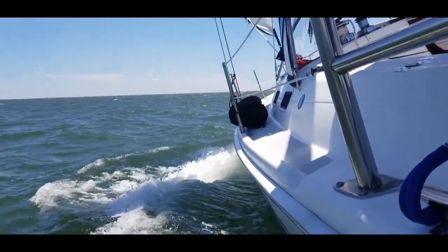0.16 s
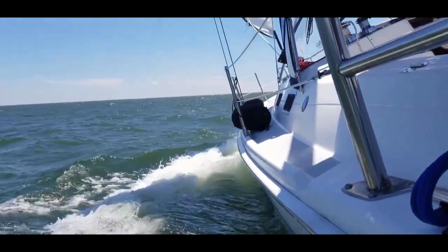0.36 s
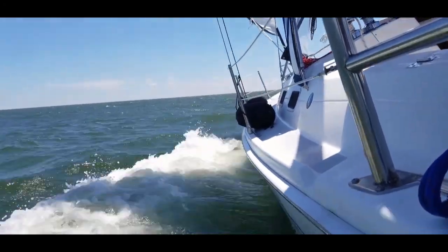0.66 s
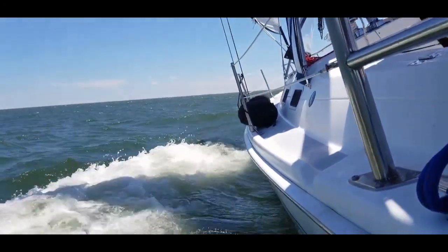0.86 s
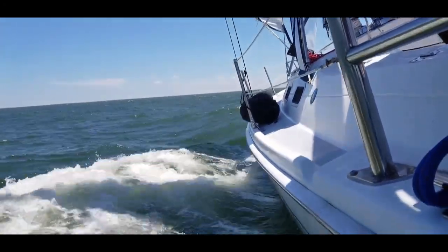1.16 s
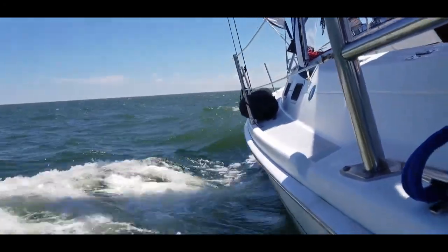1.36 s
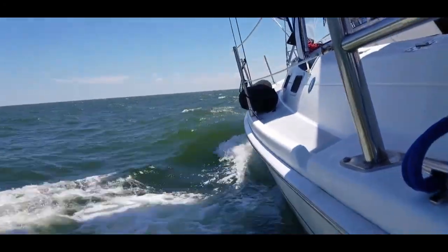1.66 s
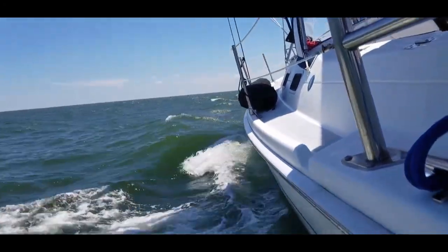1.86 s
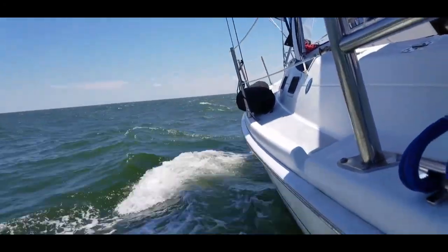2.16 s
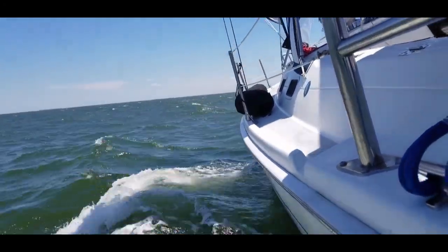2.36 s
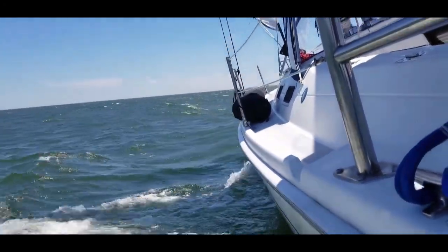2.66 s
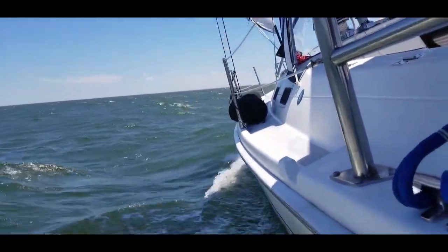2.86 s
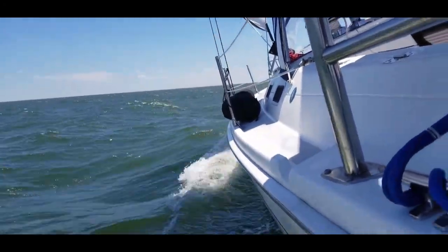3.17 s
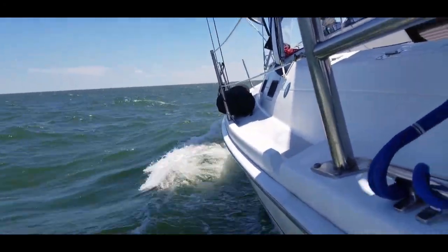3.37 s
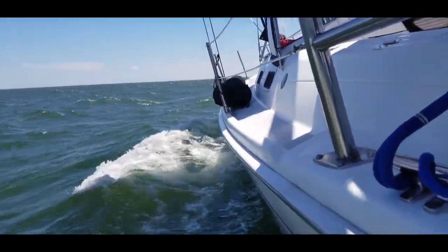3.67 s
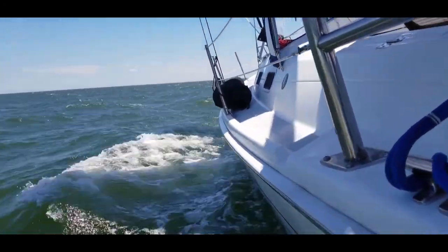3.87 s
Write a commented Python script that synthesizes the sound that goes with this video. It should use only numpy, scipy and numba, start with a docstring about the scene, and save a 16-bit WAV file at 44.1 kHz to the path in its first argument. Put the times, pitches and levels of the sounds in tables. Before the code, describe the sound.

Water foams and hisses steadily along a sailing boat's hull, close by in open air. Wind thumps the handheld phone microphone just after one second, then much harder around three seconds, with rumbling until the end.

```python
"""The bow wave of a sailing boat foams along the hull in choppy sea, heard from a phone held over the rail.
Foam, wash and spray are coloured noise, the first two with a swarm of ringing bubbles.
Wavelets slap, drops tick and a faint whistle sounds: noise bursts, each through one resonance,
broad or, for the whistle, narrow. Wind rumbles on the two microphone ports, as low noise unrelated between
them, and hits them in short rough puffs of noise and in thumps and sharper knocks, a swing or two of a sine."""
import sys
import numpy as np
from scipy import signal
from scipy.fft import rfft, irfft
from scipy.io import wavfile
from scipy.ndimage import uniform_filter1d
from numba import njit

SR = 44100
rng = np.random.default_rng(int(sys.argv[2]) if len(sys.argv) > 2 else 0)


def pcm_store(signal):
    """Save signal as 16-bit PCM."""
    levels = np.round(np.clip(np.atleast_2d(signal), -1, 1) * 32767)
    wavfile.write(sys.argv[1], SR, levels.astype(np.int16).T)


N = 176400

EDDY_SPREAD_DB = 4.5  # spread of the kick sizes in wind rumble and puffs

# wind rumble
EDDIES_PER_S, EDDY_DB = 60, 0
GUST_TILT, GUST_MID_DB = 0.052, -29  # dB per octave for each dB of wind above the middle level
BUFFET_DB, BUFFET_PER_S = 2.0, 35
EVEN_S, EVEN_SHARE = 0.036, 0.46  # window, and share of the level swings that is evened out

# puffs
PUFF_ATTACK_S, PUFF_TRIM_DB, PUFF_ROUGH_DB = 0.0039, -1.5, 2.5
PUFF_RIGHT_TILT_DB = 0.5  # extra brightness on the right, dB per octave
PUFF_EDDIES_PER_S, PUFF_EDDY_DB, PUFF_KICK_DB = 600, -0.5, 8.5

THUMP_CYCLES = 1.46
DROP_TRIM_DB = 1.5

# water
FIZZ_PER_S, FIZZ_DB, FIZZ_SPREAD_DB = 900, -9.5, 2.5
SWELL_DB, SWELL_PER_S = 0.9, 24
CHURN_DB, CHURN_PER_S = 1.0, 20
FLICKER_DB, FLICKER_PER_S = 1.0, 18
BUBBLES_PER_S, BUBBLE_DB, BUBBLE_SPREAD_DB = 1200, -7.5, 1.5
BUBBLE_EVEN = 0.03  # keeps the largest bubbles within the crowd
BUBBLE_CYCLES, BUBBLE_GLIDE = 7.1, 0.26  # fade length in cycles, share of pitch gained over it

# phone
DUCK_FROM_DB, DUCK_SHARE, DUCK_S = -29, 0.21, 0.078
TOP_HZ = 15850


def undb(db):
    """Gain of a level in dB."""
    return 10 ** (np.asarray(db) / 20)


def unit(x):
    """Scale to rms 1."""
    return x / np.sqrt(np.mean(x ** 2))


def pan(pan_db):
    """Left and right offsets in dB from a left-minus-right difference."""
    return np.array([[pan_db], [-pan_db]]) / 2


def curve(table, index):
    """One column of a table, drawn as straight lines over time."""
    times, values = np.array(table)[:, [0, index]].T
    return np.interp(np.arange(N) / SR, times, values)


def shape(table, hz):
    """The second column of a table, read on a log frequency axis."""
    points = np.array(table)
    return np.interp(np.log(hz), np.log(points[:, 0]), points[:, 1])


def walk(rate):
    """Smooth random level with spread 1, from random steps at this rate per second."""
    k = int(SR / rate)
    steps = np.repeat(rng.standard_normal(N // k + 1), k)
    smooth = uniform_filter1d(uniform_filter1d(steps, k), k)
    return unit(smooth[:N])


def bands(x, table):
    """Colour x and split it into overlapping half-octave parts that sum to rms 1."""
    hz = np.maximum(np.fft.rfftfreq(N, 1 / SR), 1)
    low_hz, high_hz = table[0][0], table[-1][0]
    inside = (hz >= low_hz) & (hz <= high_hz)
    coloured = irfft(rfft(x) * undb(shape(table, hz)) * inside, N)
    spec = rfft(unit(coloured))
    for centre in low_hz * 2 ** np.arange(0, np.log2(high_hz / low_hz) + 0.5, 0.5):
        triangle = np.maximum(1 - 2 * abs(np.log2(hz / centre)), 0)
        yield centre, irfft(spec * triangle, N)


def burst(start_s, attack_s, decay_s):
    """Slice and envelope of a short burst: straight rise to 1, exponential fall."""
    a = int(start_s * SR)
    t = np.arange(min(int((attack_s + 6 * decay_s) * SR), N - a)) / SR
    env = np.minimum(t / attack_s, 1) * np.exp(-np.maximum(t - attack_s, 0) / decay_s)
    return slice(a, a + len(t)), env


def eddies(rate, db, spread_db):
    """Two unrelated noises with sparse kicks of either sign."""
    u, noise = rng.random((2, N)), rng.standard_normal((2, 2, N))
    kicks = (u < rate / SR) * np.sign(noise[0]) * undb(spread_db * abs(noise[0]))
    return noise[1] + undb(db) * unit(kicks)


def splat(noise, hz, width, env, order):
    """A burst of noise through one resonance, given the energy of its envelope."""
    edges = [hz / 2 ** (width / 2), hz * 2 ** (width / 2)]
    sos = signal.butter(order, edges, "band", fs=SR, output="sos")
    x = signal.sosfilt(sos, noise) * env
    return x * np.sqrt(np.sum(env ** 2) / np.mean(np.sum(x ** 2, axis=1)))


def wind():
    """Low turbulence, unrelated at the two ports; stronger gusts are brighter."""
    # Wind on the ports. Each row: time in seconds, left level in dB, right level in dB.
    gusts = [(0.0, -69, -51), (0.045, -46, -38.5), (0.07, -38, -45), (0.09, -32, -37.5), (0.16, -33, -36),
             (0.18, -58, -35), (0.274, -41, -52), (0.394, -37, -41), (0.429, -44, -53), (0.469, -31, -54),
             (0.499, -51, -35.5), (0.614, -49, -40), (0.659, -29, -32.5), (0.688, -26, -31),
             (0.763, -43.5, -40.5), (0.978, -40.5, -41.5), (1.053, -61, -36), (1.068, -34, -39),
             (1.093, -44, -23), (1.137, -28.5, -60), (1.177, -31.5, -25), (1.232, -19, -20),
             (1.247, -19, -42), (1.272, -16, -16.5), (1.352, -31.5, -40), (1.377, -24, -20),
             (1.397, -39, -44), (1.457, -38, -33), (1.482, -30.5, -43), (1.507, -31.5, -34.5),
             (1.527, -37, -56), (1.546, -21, -38), (1.601, -26.5, -43), (1.651, -49, -59),
             (1.671, -19.5, -29.5), (1.716, -50, -37), (1.731, -33, -43), (1.756, -31, -33),
             (1.776, -42, -49), (1.801, -28.5, -47), (1.861, -45, -37), (1.921, -53, -38),
             (1.941, -37, -55), (1.985, -43.5, -38), (2.06, -44, -39), (2.085, -50, -44),
             (2.13, -26.5, -53), (2.15, -49, -55), (2.17, -39, -41), (2.315, -53, -84), (2.415, -46.5, -40),
             (2.529, -49.5, -70), (2.589, -44, -41), (2.654, -81, -49), (2.674, -29, -33),
             (2.694, -61, -30), (2.764, -29, -65), (2.799, -53, -41), (2.829, -48, -38.5),
             (2.908, -42, -36), (2.943, -32, -23), (2.968, -31, -55), (2.993, -23, -19.5),
             (3.018, -25, -31), (3.063, -18, -20), (3.088, -11, -19), (3.118, -23, -17), (3.138, -8.5, -7),
             (3.183, -26, -42), (3.203, -25, -32), (3.253, -24, -26), (3.273, -18, -20),
             (3.312, -24.5, -21.5), (3.327, -33, -37), (3.352, -27, -26), (3.367, -40, -34),
             (3.407, -32, -24), (3.442, -23.5, -44), (3.472, -38, -41), (3.492, -26, -32),
             (3.542, -37, -34), (3.572, -24, -28), (3.622, -34.5, -26.5), (3.652, -32, -41),
             (3.677, -48, -40), (3.692, -38, -34), (3.737, -41.5, -54), (3.756, -30, -41),
             (3.831, -40, -36), (3.851, -25, -34), (3.871, -42, -32), (3.889, -27, -30), (3.905, -38, -15),
             (3.926, -22, -32), (3.946, -26, -27), (3.964, -29, -30), (3.975, -37, -40), (3.996, -29, -29)]
    # Colour of the rumble. Each row: frequency in Hz, relative density in dB per Hz before the gust tilt.
    rumble = [(18, -56), (30, -6.5), (60, 1), (120, -1), (200, -5.5), (300, -13), (500, -16.5), (900, -78)]
    level_db = np.array([curve(gusts, index=1), curve(gusts, index=2)])
    tilt_db = GUST_TILT * (level_db - GUST_MID_DB)
    low = 0
    for hz, x in bands(eddies(EDDIES_PER_S, EDDY_DB, EDDY_SPREAD_DB), rumble):
        low = low + x * undb(tilt_db * np.log2(hz / 100))
    power = uniform_filter1d(low ** 2, int(EVEN_S * SR))
    evened = low / power ** (EVEN_SHARE / 2)
    buffet = undb(BUFFET_DB * np.array([walk(BUFFET_PER_S), walk(BUFFET_PER_S)]))
    return unit(evened * buffet) * undb(level_db)


def puffs():
    """Short rough blasts of air with a kick at the crest, brighter on the right port."""
    # Puffs of wind. Each row: start in seconds, level in dB before the common trim,
    # left minus right in dB, decay in ms, brightness on the left in dB per octave.
    blasts = [(0.132, -25, -3, 4.4, 3), (0.82, -32.5, -1, 28, -8), (1.087, -33, 6, 8, 7),
              (1.214, -20.5, -1, 11, 0.5), (1.223, -11.5, -1.5, 7.9, -0.7), (1.239, -20, 8, 6.1, -2),
              (1.252, -31, -3, 14, -5), (1.272, -15, -2, 11, -2.5), (1.285, -18, -4, 7.2, -9),
              (1.295, -22.5, -10, 7.4, 1.5), (1.305, -16, 0, 3.5, -2.5), (1.312, -31, 9, 16, 6),
              (1.37, -28.5, -9, 11.4, -4), (1.448, -34.5, -3, 24, 4), (1.474, -32.5, -9, 5, 4),
              (1.501, -25.5, -3, 2.9, 4), (1.513, -31.5, -10, 4, 3), (1.523, -30, -4, 12, 3),
              (1.565, -28, -5, 6.4, -7), (1.55, -30, -2, 27, -2), (1.578, -36, -7, 7.7, -8),
              (1.786, -33.5, -3, 11, 0), (2.733, -29, -5, 4.6, 2.5), (2.947, -52, -4, 10.4, -4),
              (2.998, -26.5, -4.0, 11, 7.5), (3.027, -23, -4, 12, -7), (3.061, -16.5, -10, 6.7, 1.9),
              (3.069, -16.5, -1, 16, 1.5), (3.082, -17, -13, 12, -6.5), (3.094, -30, -12, 9.8, -11),
              (3.116, -20, 1, 9.7, 2), (3.129, -7.5, -8, 6, -0.7), (3.161, -12.5, -6, 6, -0.2),
              (3.172, -20, -5, 11, -6), (3.182, -23, 14, 7.5, 1), (3.195, -14.5, -1.5, 14, -2),
              (3.225, -26.5, -15, 8.4, -2), (3.242, -26.5, -5, 27, 5), (3.263, -17.5, -7.5, 14, -2),
              (3.298, -24, 20, 3.9, -8.5), (3.342, -22.5, 4.5, 10, -5), (3.41, -22, -7, 8.4, -1.5),
              (3.422, -22, 0.5, 21, -2.8), (3.458, -42, -10, 4.3, 9), (3.558, -18, -2.5, 12, -5.5),
              (3.57, -32.5, -5, 24, 2), (3.592, -23, 3, 9.6, -2.5), (3.619, -41, -15, 8.1, -15),
              (3.798, -27, -2, 3.9, -10), (3.844, -30.5, -8, 34, -1.5), (3.88, -20.5, 8, 8.9, -2.3),
              (3.892, -19.5, -7.5, 17, -0.5), (3.913, -27, 4, 24, 2.1), (3.937, -27, 0, 14, -6),
              (3.958, -23, 5, 9, -3)]
    # Colour of the air. Each row: frequency in Hz, relative density in dB per Hz before the brightness.
    air_colour = [(90, -9), (170, -7), (260, 0.5), (480, -5.5), (760, -3), (1200, -10.5), (1700, -20),
                  (3400, -37.5), (7000, -59)]
    rough = undb(PUFF_ROUGH_DB * np.array([walk(250), walk(250)]))
    drive = eddies(PUFF_EDDIES_PER_S, PUFF_EDDY_DB, EDDY_SPREAD_DB) * rough
    crests = ((np.array(blasts)[:, 0] + PUFF_ATTACK_S) * SR).astype(int)
    drive[:, crests] = undb(PUFF_KICK_DB) * rng.choice([-1, 1], (len(crests), 2)).T
    parts = list(bands(drive, air_colour))
    out = np.zeros((2, N))
    for s, db, pan_db, decay_ms, tilt_db in blasts:
        at, env = burst(s, PUFF_ATTACK_S, decay_ms / 1000)
        tilts = np.array([[tilt_db], [tilt_db + PUFF_RIGHT_TILT_DB]])
        air = sum(x[:, at] * undb(tilts * np.log2(hz / 600)) for hz, x in parts) * env
        # each port gets the energy of the envelope
        air = air * np.sqrt(np.sum(env ** 2) / np.sum(air ** 2, axis=1, keepdims=True))
        out[:, at] += air * undb(db + PUFF_TRIM_DB + pan(pan_db))
    return out


def thumps_and_knocks():
    """A swing or two of pressure under a smooth window, each port at its own point of the swing."""
    # Low thumps and higher, sharper knocks. Each row: start in seconds, window peak level in dB,
    # pitch in Hz, left minus right in dB.
    knocks = [(0.085, -33, 120, 0), (1.208, -21, 178, 1), (1.2245, -9, 800, -10), (1.228, -11, 500, 1),
              (1.241, -12, 600, -3), (1.274, -27, 260, 5), (1.304, -11, 210, 7), (1.33, -28, 110, -2),
              (1.5, -21, 149, -1), (1.561, -26, 202, 5), (2.124, -36, 110, -4), (2.161, -26, 140, 1),
              (2.691, -25, 121, -2), (2.992, -12.5, 140, -2), (3.063, -10, 443, -5), (3.08, -15, 600, -2),
              (3.089, -6, 202, 6), (3.13, -6, 650, -3), (3.133, -9, 505, 2), (3.142, -12, 99, -3),
              (3.197, -9, 700, 2), (3.263, -13, 130, 1), (3.57, -21, 350, 3), (3.853, -22, 70, 13),
              (3.884, -24, 605, 5), (3.8942, -13, 800, -1), (3.959, -21, 190, 6)]
    out = np.zeros((2, N))
    turns = rng.random((len(knocks), 2, 1))  # starting points in cycles
    for (s, db, hz, pan_db), turn in zip(knocks, turns):
        a, n = int(s * SR), int(THUMP_CYCLES * SR / hz)
        swing = np.hanning(n) * np.sin(2 * np.pi * (hz * np.arange(n) / SR + turn))
        out[:, a:a + n] += swing * undb(db + pan(pan_db))
    return out


def drops():
    """Single drops close by: very short ticks of noise through a gentle resonance."""
    # Drops. Each row: start in seconds, level in dB before the common trim, centre in Hz,
    # left minus right in dB, decay in ms, width in octaves.
    ticks = [(0.3244, -43, 8740, 2, 2.3, 0.98), (0.4658, -49, 9820, 0.0, 2.5, 0.9),
             (0.491, -36.5, 11800, -0.5, 2.5, 0.9), (0.5437, -45, 10500, -2, 2.5, 0.9),
             (2.4993, -41, 12600, -1, 2.5, 0.76), (2.5703, -33.5, 13500, 0.0, 2.5, 0.9),
             (2.9853, -24, 13100, -5, 0.85, 0.8), (2.9841, -33.5, 6960, 4, 2, 1.1),
             (3.0712, -40, 3200, -3, 0.92, 1), (3.128, -43, 4500, -1, 1, 1.6),
             (3.165, -32.5, 3320, -2, 0.73, 2.1), (3.245, -43, 4200, 0, 1.5, 1.6),
             (3.1754, -37, 13600, 2.5, 2.5, 0.9), (3.2195, -44, 9010, 3, 2.5, 0.9),
             (3.3094, -48, 11200, 2, 2.5, 0.9)]
    out, noise = np.zeros((2, N)), rng.standard_normal((2, N))
    for s, db, hz, pan_db, decay_ms, width in ticks:
        at, env = burst(s, 0.0014, decay_ms / 1000)
        tick = splat(noise[:, at], hz, width, env, order=1)
        out[:, at] += tick * undb(db + DROP_TRIM_DB + pan(pan_db))
    return out


def slaps_and_whistle():
    """Slaps of wavelets, a sharp puff, and a faint narrow whistle: noise through a steeper resonance."""
    # Slaps, the puff near 2.7 s, and the whistle near 2.6 kHz. Each row: start in seconds,
    # level in dB, centre in Hz, width in octaves, decay in ms.
    resonant_bursts = [(0.071, -28, 1090, 1.34, 2), (0.82, -41, 1000, 1, 2), (1.408, -45, 2530, 0.12, 22),
                       (1.432, -45, 2660, 0.13, 12), (1.446, -46, 2650, 0.12, 10),
                       (2.732, -34.5, 1010, 1.8, 3), (3.415, -45, 1880, 0.86, 17),
                       (3.462, -41.5, 1800, 0.88, 2.7), (3.57, -45.5, 2000, 1.1, 8),
                       (3.598, -47.5, 1700, 1, 14), (1.665, -26, 880, 0.54, 4.3),
                       (1.667, -38.5, 2830, 1.4, 4.2), (2.646, -36.5, 1010, 3.2, 6.7),
                       (2.657, -43, 2660, 1.3, 22), (2.674, -32.5, 2310, 1.7, 1.9),
                       (2.9845, -27.5, 2800, 1.05, 1.5)]
    out, noise = np.zeros((2, N)), rng.standard_normal((2, N))
    for s, db, hz, width, decay_ms in resonant_bursts:
        at, env = burst(s, 0.003, decay_ms / 1000)
        shared = noise[:, at] + noise[0, at]  # sides partly alike, the left louder
        out[:, at] += splat(shared, hz, width, env, order=3) * undb(db)
    return out


@njit
def ring(start, hz, cycles, glide, size, n):
    """Bubbles: short tones that rise as they fade."""
    out = np.zeros(n)
    for k in range(len(start)):
        length, phase = int(3 * cycles * SR / hz[k]), 0.
        for i in range(min(length, n - start[k])):
            age = i * hz[k] / SR / cycles
            phase += 2 * np.pi * hz[k] * (1 + glide * age) / SR
            out[start[k] + i] += size[k] * np.sin(phase) * np.exp(-2 * age)
    return out


def bubbles():
    """A dense random swarm of bubbles; size grows with pitch to offset the shorter ringing."""
    u = rng.random((int(BUBBLES_PER_S * N / SR), 3))
    start = (u[:, 0] * N).astype(np.int64)
    hz = 250 + 3500 * u[:, 1]
    size = undb(-BUBBLE_SPREAD_DB * np.log(u[:, 2] + BUBBLE_EVEN)) * np.sqrt(hz)
    return unit(ring(start, hz, 1. * BUBBLE_CYCLES, 1. * BUBBLE_GLIDE, size, N))


def water():
    """Foam, wash and spray: noise and bubbles whose bands swell together and flicker alone."""
    # Course of the bow wave. Each row: time in seconds, then foam, wash and spray level in dB
    # before swell, churn, flicker and foam brightness.
    wave = [(0.0, -37.5, -44.5, -47.5), (0.2, -35.5, -46, -45), (0.38, -37, -44.5, -46),
            (0.59, -37.5, -45, -44.5), (0.81, -36, -42, -44.5), (1.06, -38, -43.5, -43.5),
            (1.19, -37.5, -41.5, -43.5), (1.44, -44, -48, -49.5), (1.75, -44.5, -48, -48),
            (2.0, -46.5, -48, -49), (2.41, -42, -49.5, -48), (2.7, -41, -49, -46), (2.9, -43, -46, -46),
            (3.03, -36.5, -44.5, -44.5), (3.14, -34.5, -47.5, -48), (3.21, -44, -48.5, -49),
            (3.36, -44.5, -48.5, -49.5), (3.59, -47.5, -53.5, -53), (3.87, -50, -58, -55),
            (4.0, -51, -55, -54)]
    # Colours of the three layers. Each row: frequency in Hz, relative density in dB per Hz.
    foam = [(150, -7), (300, -6), (460, -7.5), (760, 1), (1050, -2), (1400, -5.5), (1700, -14), (2500, -17)]
    wash = [(1200, -3.5), (1700, -7), (2100, -2), (2800, -5), (3700, -9.5), (5000, -10.5), (7000, -42)]
    spray = [(3500, -10), (5500, -4), (7200, -6.5), (9000, -3.5), (11000, -2), (13200, -0.5), (14200, -5),
             (16500, -2)]
    # Likeness of left and right. Each row: frequency in Hz, likeness from 0 to 1.
    likeness = [(300, 0.99), (640, 0.75), (1400, 0), (3000, 0)]
    # Brightness of the foam. Each row: time in seconds, tilt in dB per octave.
    foam_tilt = [(0.0, 2), (0.4, 0.5), (0.9, 1), (1.3, 0.5), (2.0, 0), (2.6, 0.5), (3.2, -0.5), (4.0, 2.5)]
    out, swell = 0, SWELL_DB * walk(SWELL_PER_S)
    for k, table in enumerate((foam, wash, spray)):
        drive = eddies(FIZZ_PER_S, FIZZ_DB, FIZZ_SPREAD_DB)
        if k < 2:  # foam and wash bubble, spray only hisses
            drive = drive + undb(BUBBLE_DB) * np.array([bubbles(), bubbles()])
        layer, churn = 0, CHURN_DB * walk(CHURN_PER_S)
        tilt = curve(foam_tilt, index=1) if k == 0 else 0
        for hz, (mid, side) in bands(drive, table):
            like = shape(likeness, hz)
            spread = np.sqrt((1 - like) / 2) * side * np.array([[1], [-1]])
            pair = np.sqrt((1 + like) / 2) * mid + spread
            flicker = FLICKER_DB * walk(FLICKER_PER_S)
            layer = layer + pair * undb(swell + flicker + churn + tilt * np.log2(hz / 800))
        out = out + layer * undb(curve(wave, index=k + 1))
    return out


def scene():
    """Wind on the ports, drops, slaps with a faint whistle, and the bow wave."""
    return wind() + puffs() + thumps_and_knocks() + drops() + slaps_and_whistle() + water()


def record(dry):
    """The phone turns down under loud gusts, rounds the highest peaks and cuts the top."""
    keep = np.exp(-1 / (DUCK_S * SR))
    power = signal.lfilter([1 - keep], [1, -keep], np.mean(dry ** 2, axis=0))
    loud_db = 10 * np.log10(power + 1e-12)
    ducked = dry * undb(-DUCK_SHARE * np.maximum(loud_db - DUCK_FROM_DB, 0))
    soft = np.tanh(ducked)
    top_cut = signal.ellip(12, 0.2, 70, TOP_HZ, fs=SR, output="sos")
    return signal.sosfilt(top_cut, soft)


dry = scene()
out = record(dry)
pcm_store(out)
```